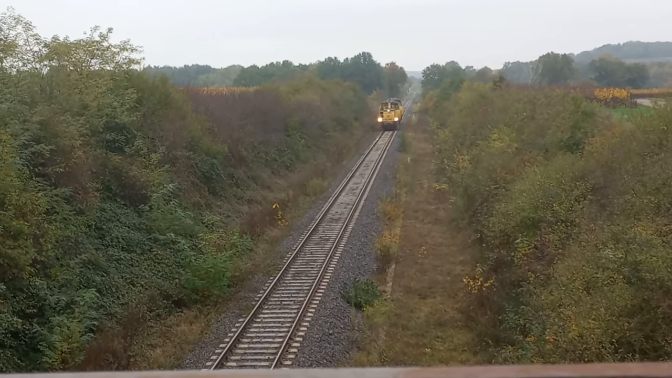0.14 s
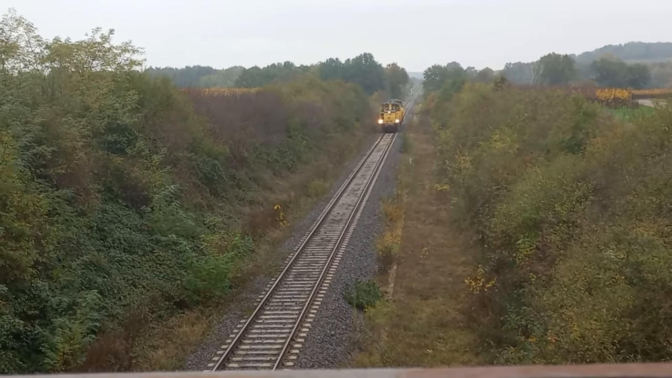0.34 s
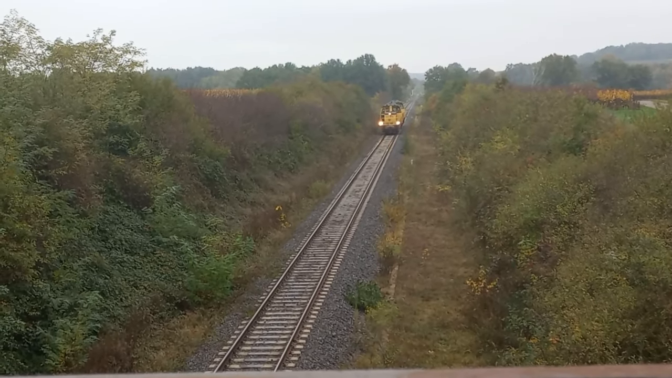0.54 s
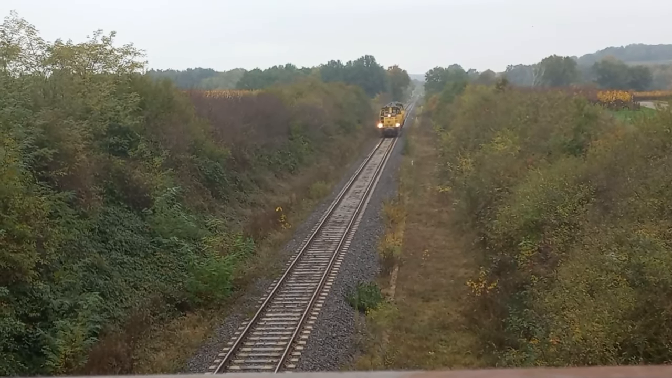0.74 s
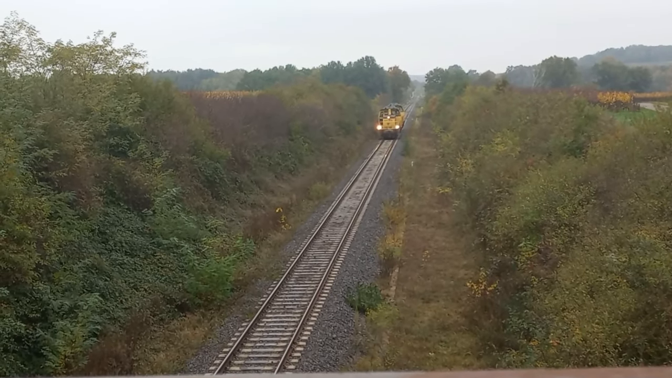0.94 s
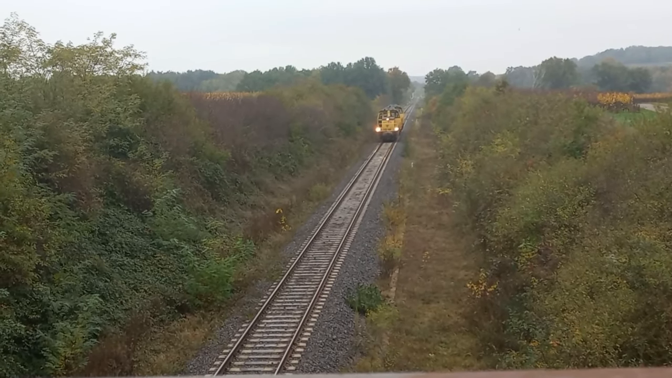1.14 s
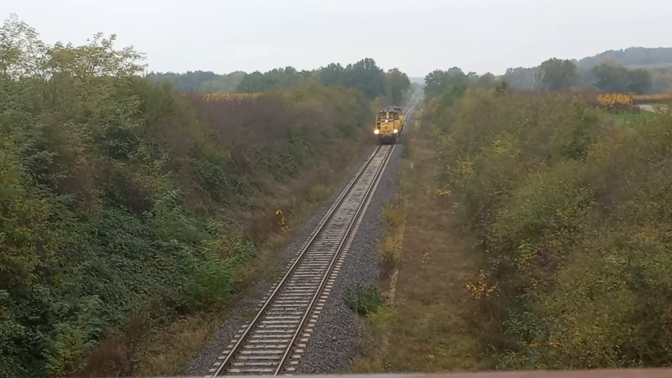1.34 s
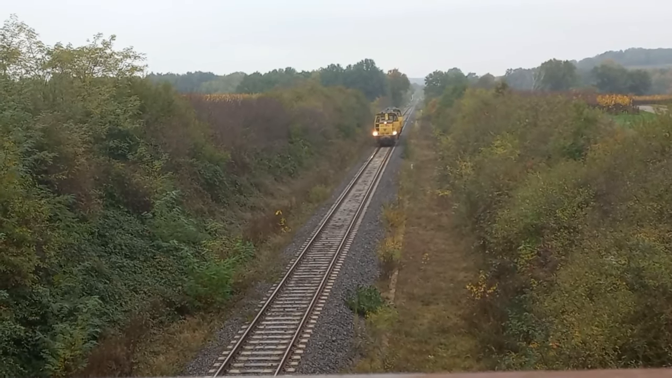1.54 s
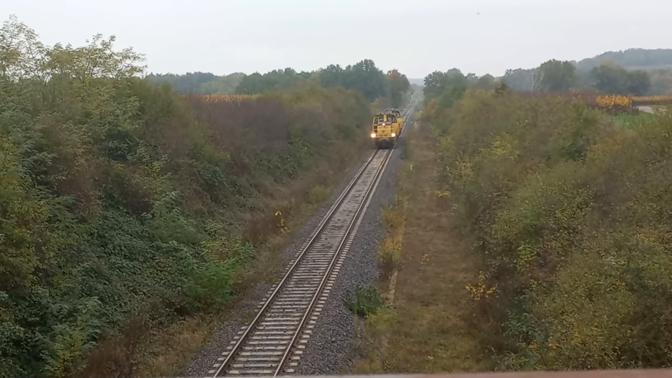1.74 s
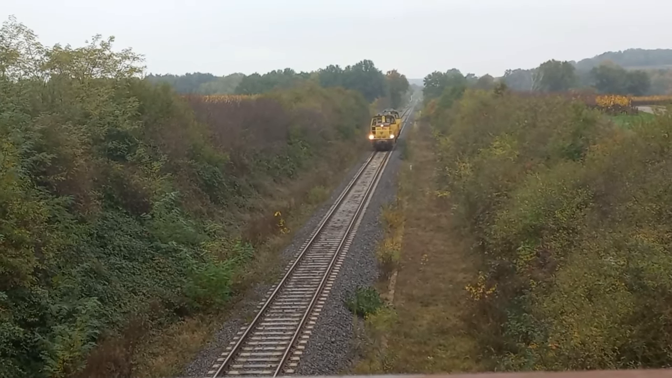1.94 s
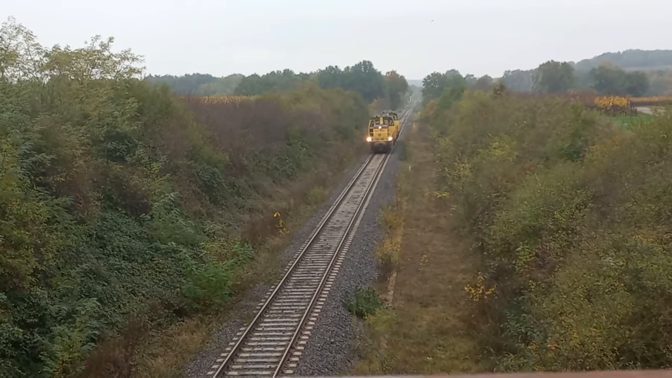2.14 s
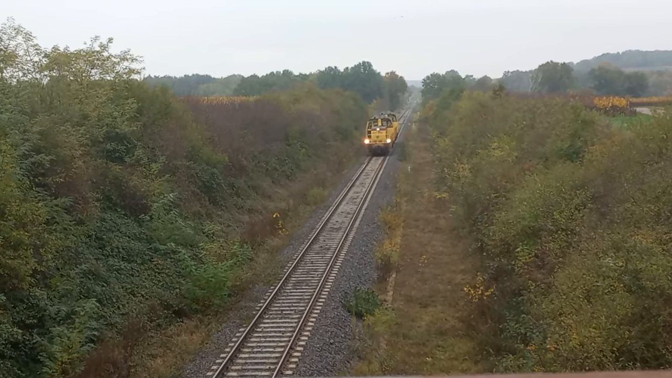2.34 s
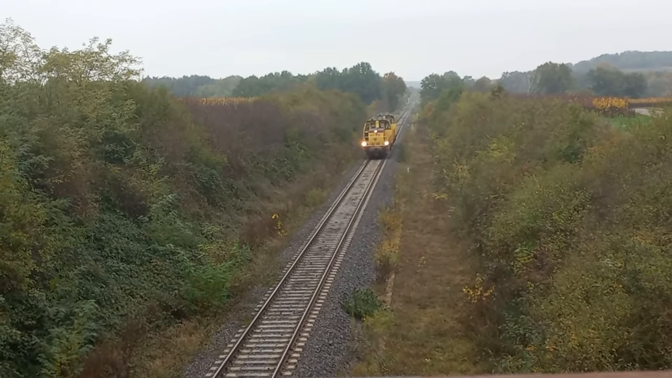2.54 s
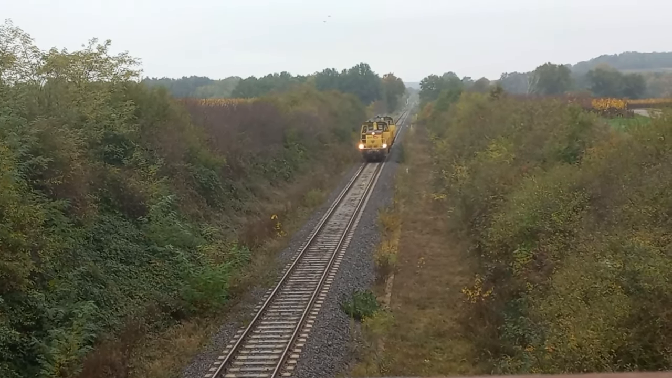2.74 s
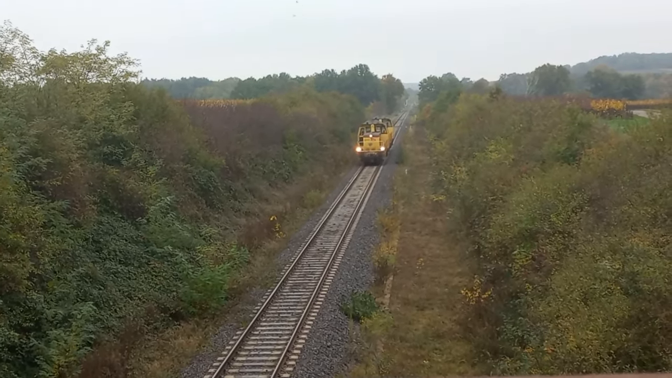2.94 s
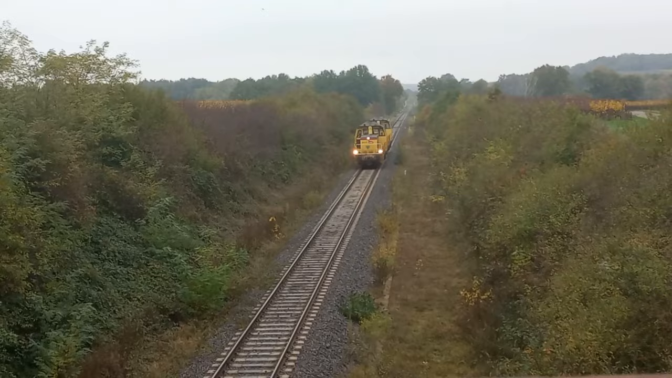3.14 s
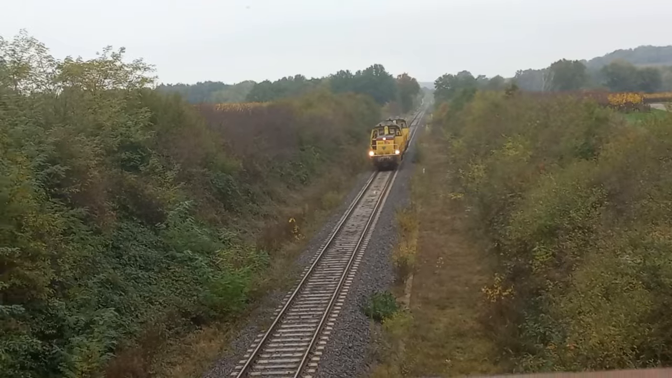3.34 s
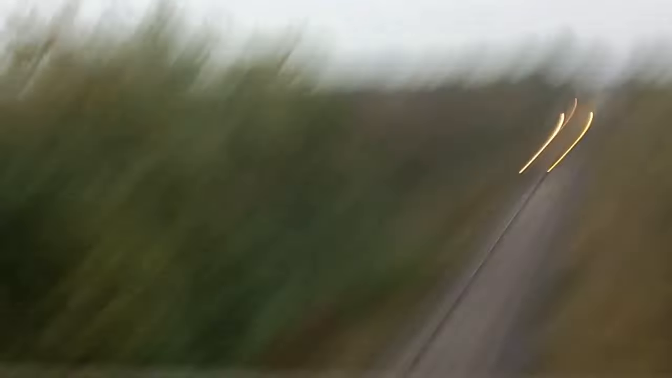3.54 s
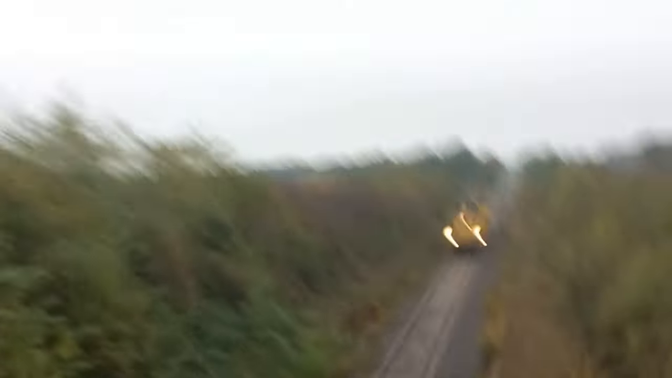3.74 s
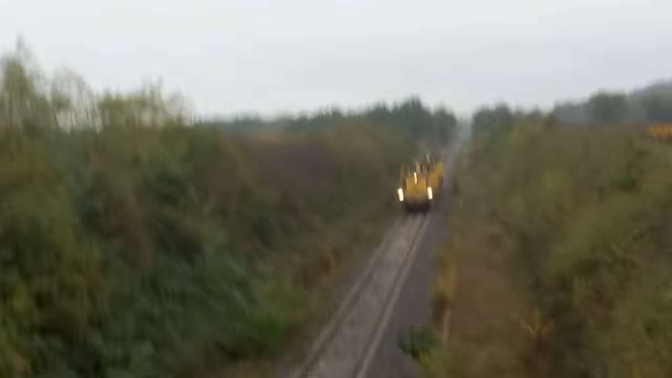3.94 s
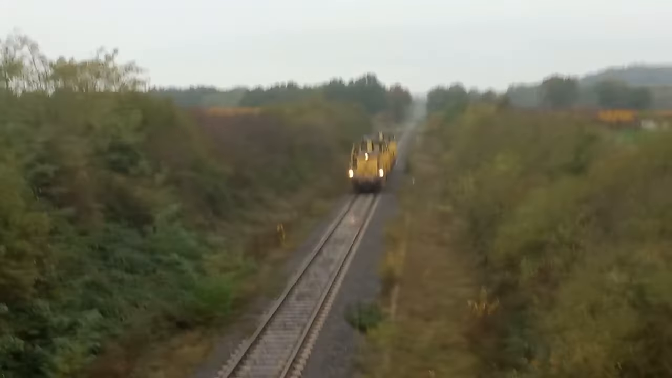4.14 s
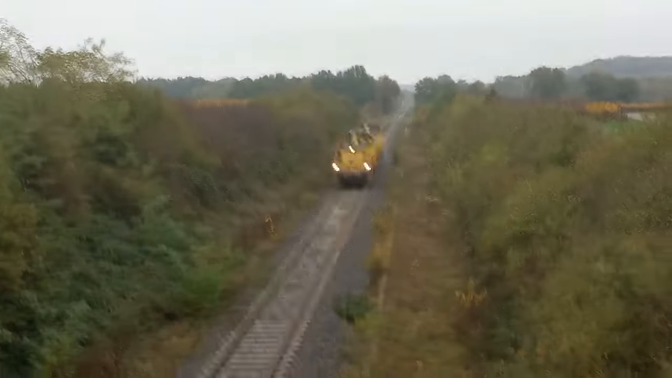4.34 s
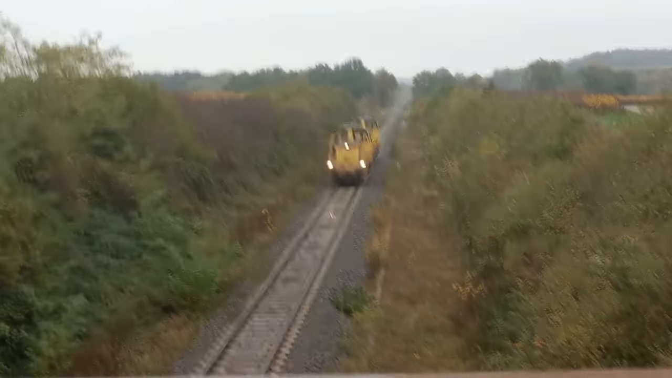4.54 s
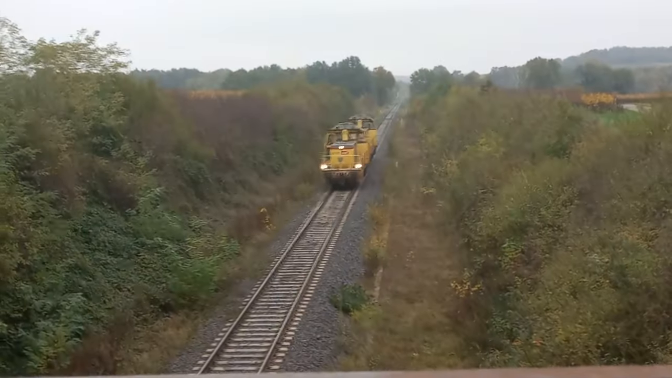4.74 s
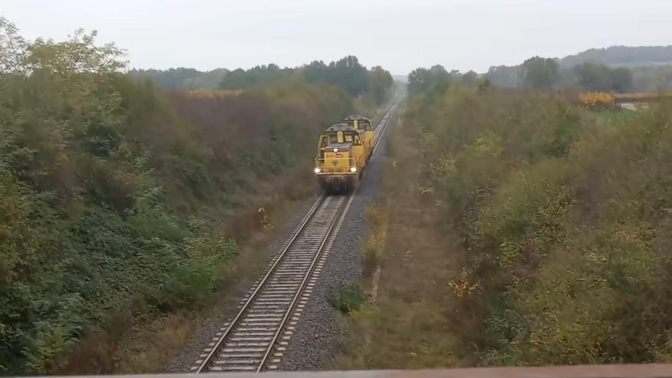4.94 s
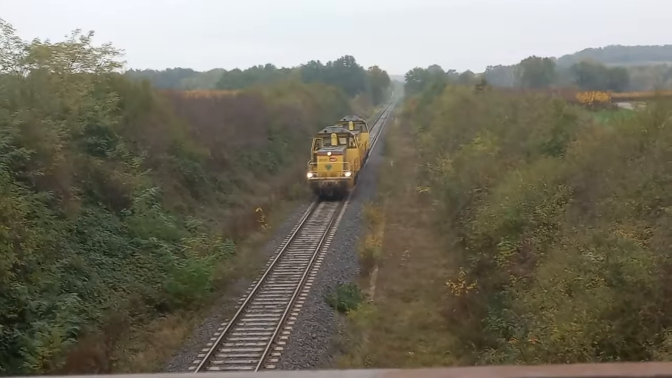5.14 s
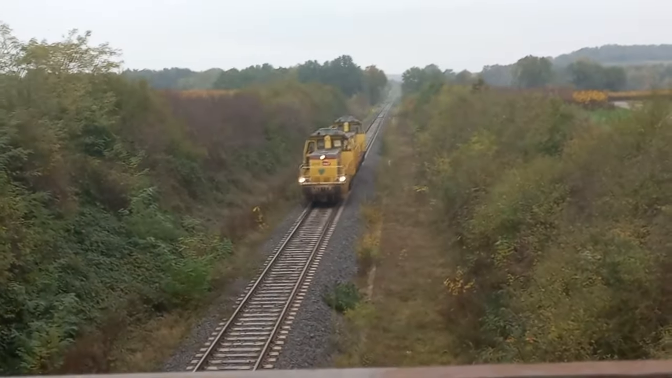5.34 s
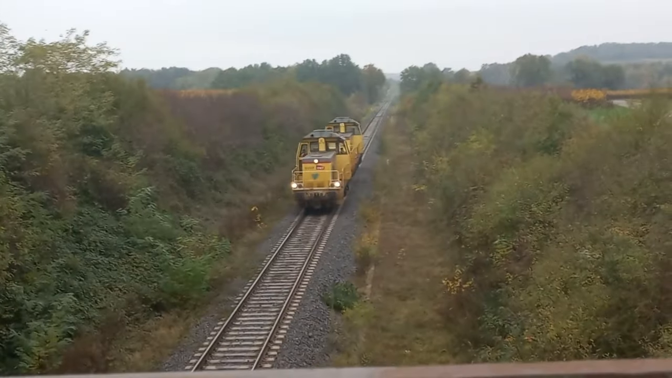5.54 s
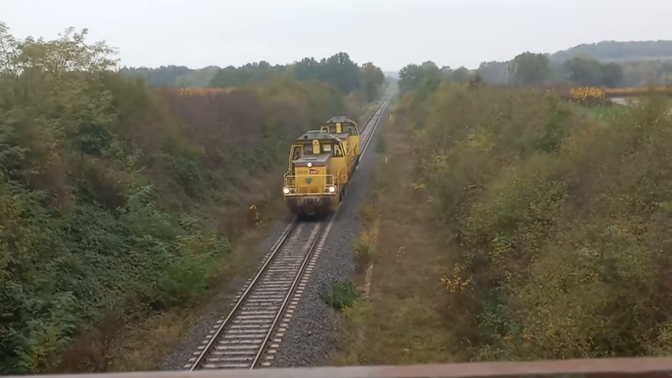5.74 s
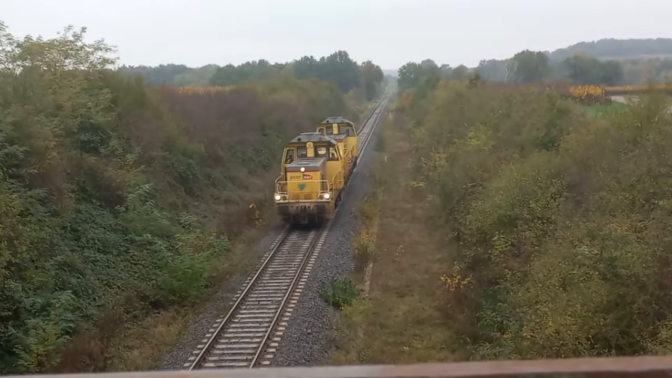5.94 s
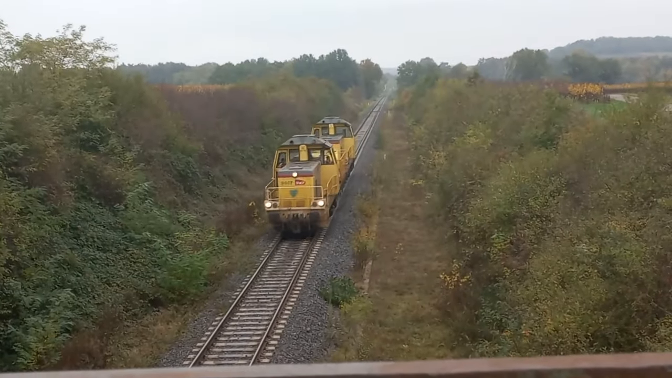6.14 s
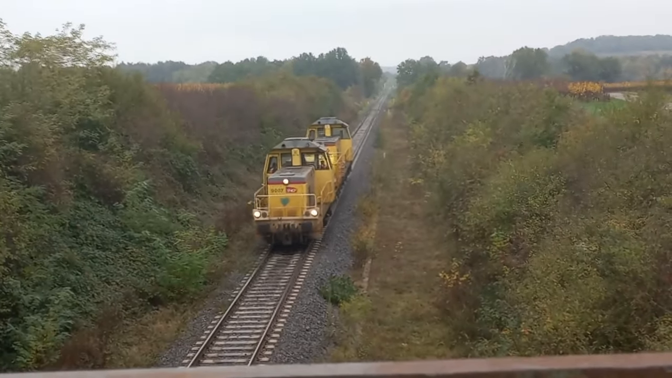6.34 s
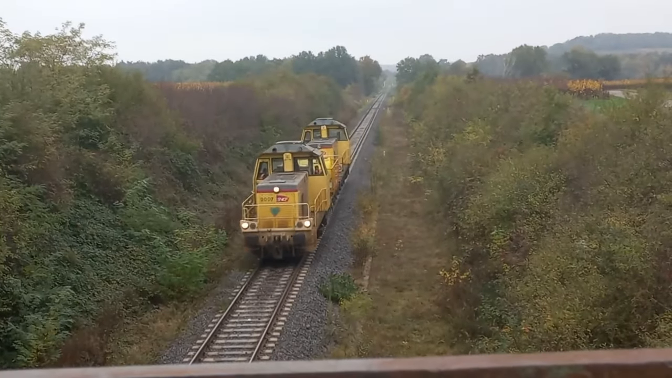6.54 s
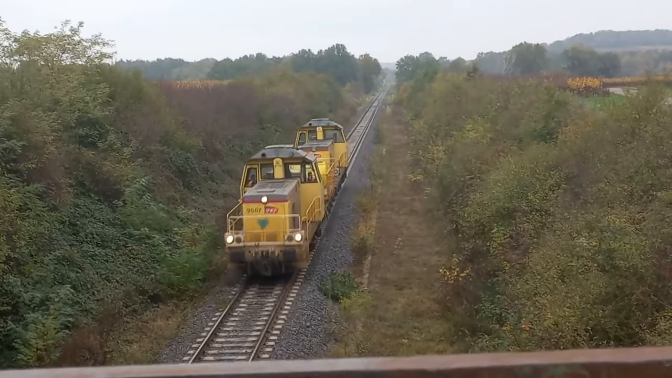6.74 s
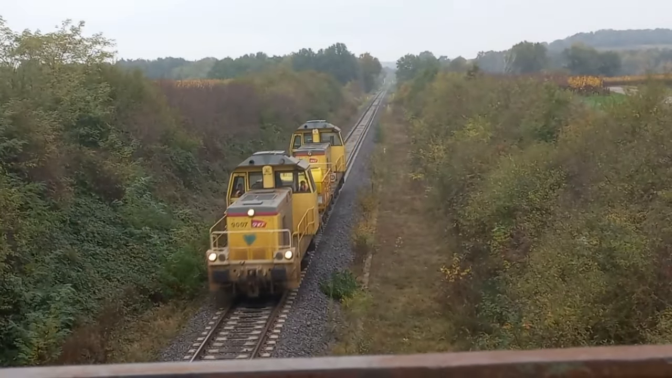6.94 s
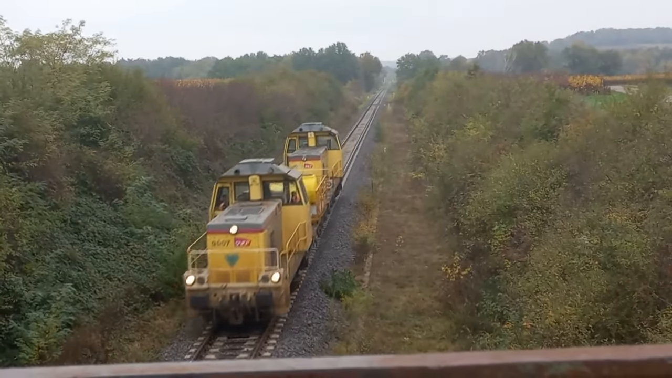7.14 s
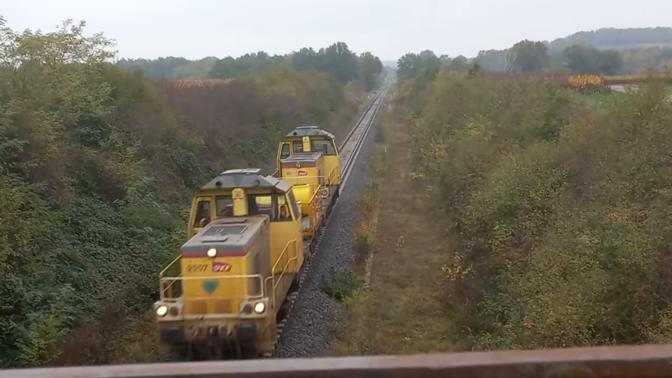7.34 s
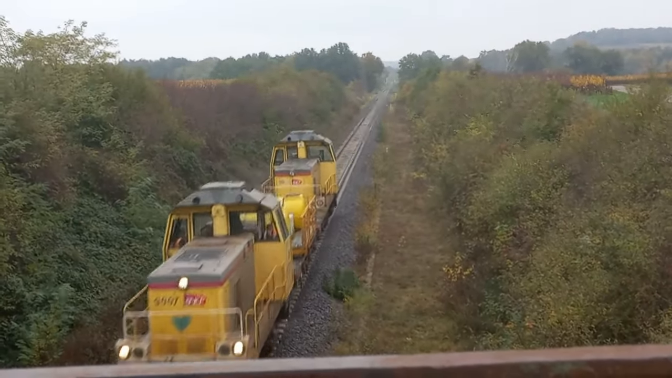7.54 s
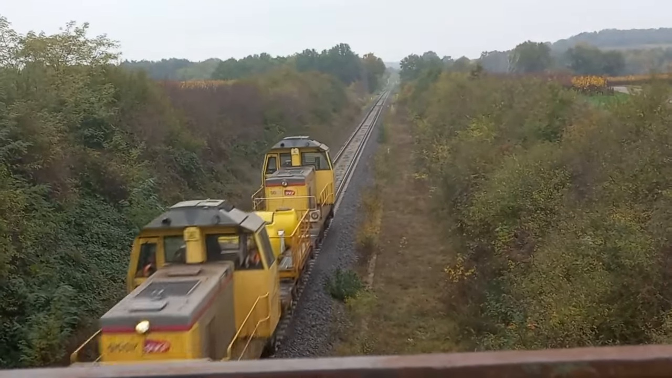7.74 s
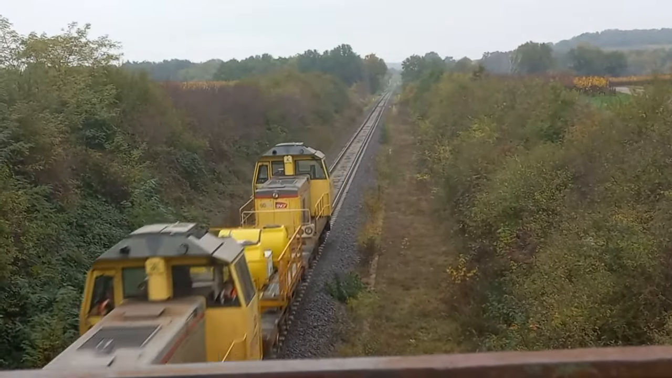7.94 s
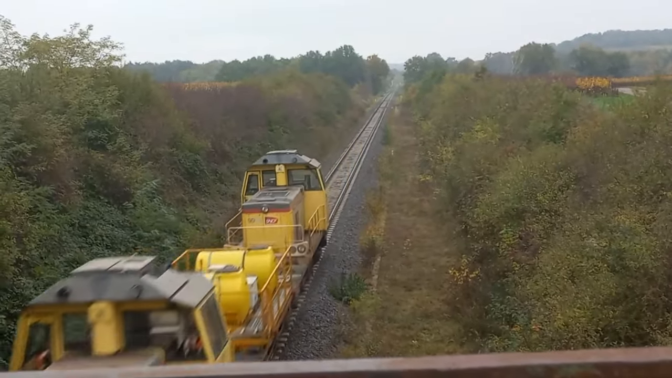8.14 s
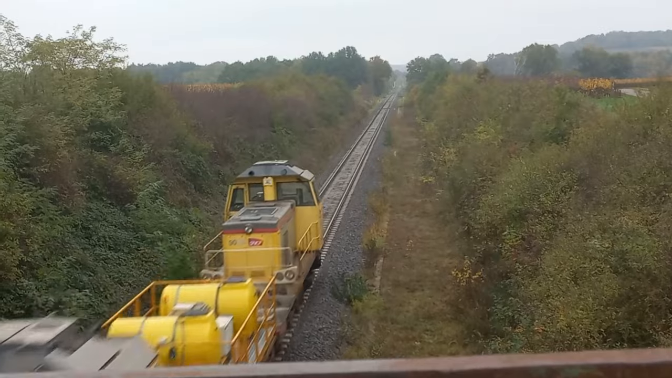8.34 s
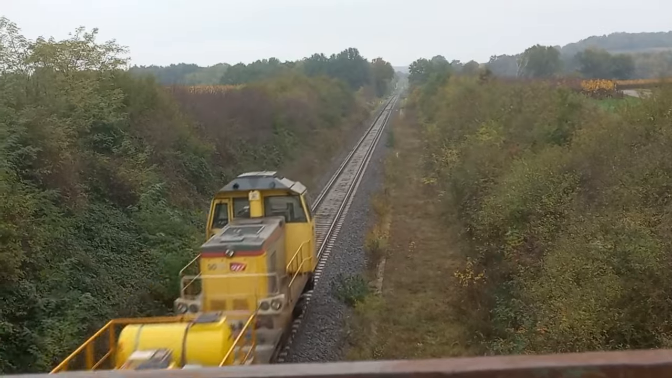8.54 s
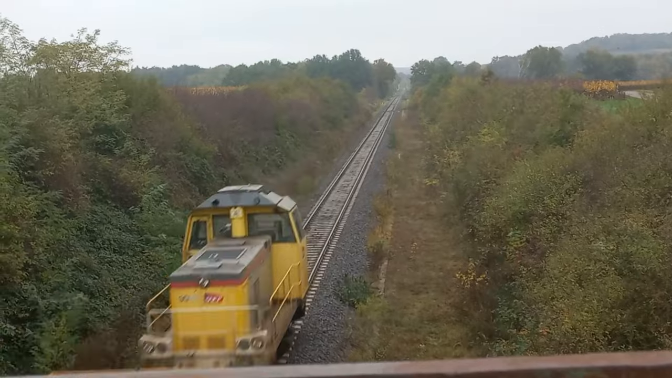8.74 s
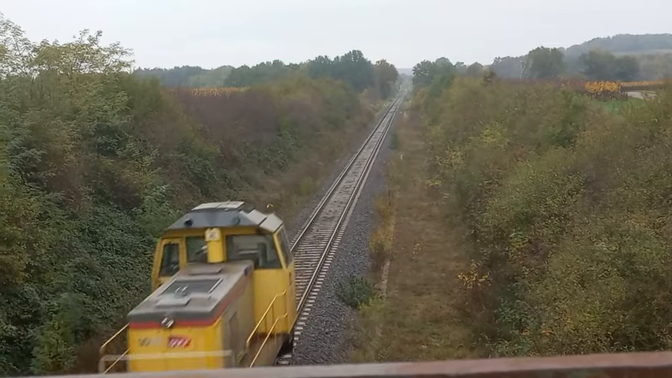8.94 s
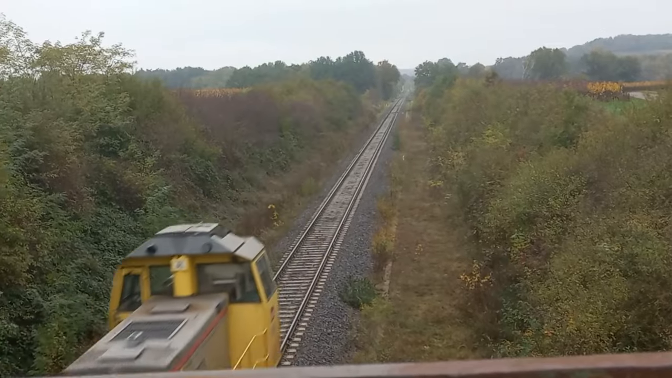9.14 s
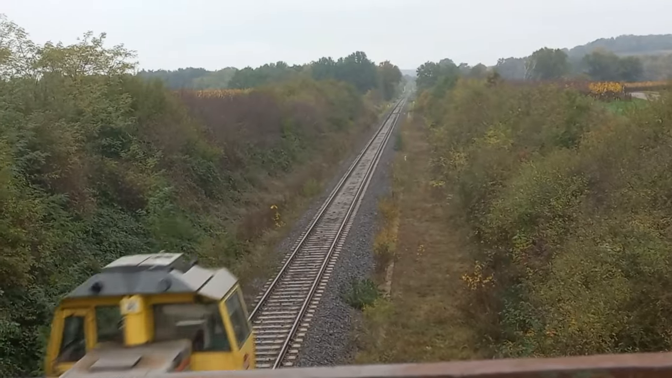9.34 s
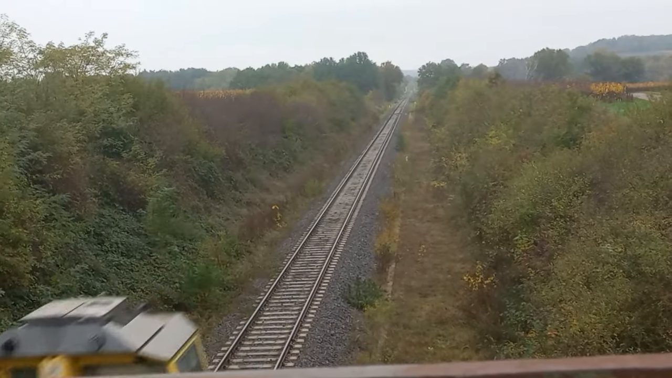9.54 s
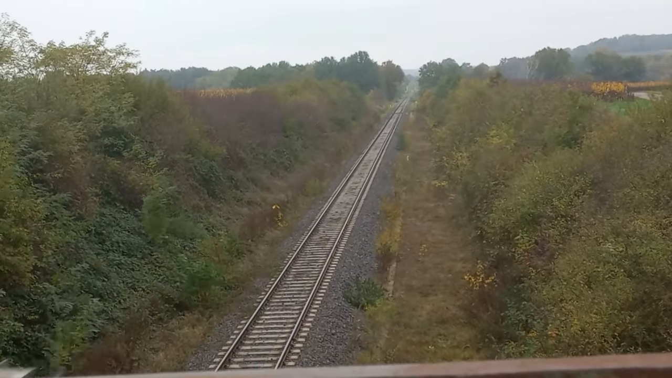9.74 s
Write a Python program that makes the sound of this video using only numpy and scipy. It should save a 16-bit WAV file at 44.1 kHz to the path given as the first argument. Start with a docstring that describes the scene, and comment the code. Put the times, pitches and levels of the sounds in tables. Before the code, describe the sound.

Near quiet at first, with a distant engine drone approaching through an open cutting. A brief reedy horn blast bursts out and its echo trails away; the camera casing clicks and rustles close by. The train builds steadily, wheels thumping over joints, and two diesel locomotives pass directly below the bridge with broad low roar, metallic clatter and airy hiss, becoming wider in stereo before the treble eases off.

```python
"""A railway cutting under a bridge, where a hand-held camera stands: two coupled diesel locomotives roll up and
pass below. Rumble, drone, roar, clatter and hiss are shaped noise that swells, combed by the ground echo;
an engine hum and a brief thin tone are sines, rail joints ringing thumps. One short horn blast, a train of
reed pulses, rings off the banks; two faint higher toots sound far off. The casing ticks and rustles: bursts
through plastic modes."""
import sys
import numpy as np
from scipy import signal
from scipy.io import wavfile
from scipy.ndimage import uniform_filter1d

SR = 44100
rng = np.random.default_rng(int(sys.argv[2]) if len(sys.argv) > 2 else 0)


def generate_wav(signal):
    """Clip the signal to [-1, 1] and save it as 16-bit WAV at the path in sys.argv[1]."""
    frames = np.transpose(np.atleast_2d(signal))
    scaled = np.clip(frames, -1, 1) * 32767
    pcm = np.round(scaled).astype(np.int16)
    wavfile.write(sys.argv[1], SR, pcm)


N = 436590

# Loudness of the nearing train. Each row: time in seconds, drone and roar relative level in dB.
ENGINE_LEVELS = [(0, -53, -53), (.55, -48, -50), (1.3, -46.5, -47.5), (2.9, -43, -43.5),
                 (3.6, -43.5, -44.5), (4.55, -39.5, -40.5), (4.85, -36, -36.5), (5.4, -32.5, -34.5),
                 (6.1, -31, -32.5), (6.8, -26, -28.5), (7.3, -24, -29), (7.7, -20.5, -28.5),
                 (8.1, -20.5, -26), (8.6, -20.5, -24.5), (8.95, -23, -27), (9.3, -20, -25.5),
                 (9.6, -19, -29.5), (9.9, -21.5, -27.5)]
# Clatter loudness, peaking as the second locomotive passes below. Each row: time in seconds, relative level in dB.
CLATTER_LEVELS = [(0, -60), (2, -55), (4.4, -49.5), (4.7, -46), (6, -42.5), (6.8, -38.5), (7.9, -36.5),
                  (8.15, -33), (8.3, -33.5), (8.7, -27.5), (8.87, -27.5), (9.03, -27), (9.14, -30.5),
                  (9.4, -32), (9.52, -36), (9.9, -36.5)]
# Spectra of the five train layers. Each row: frequency in Hz, relative level in dB.
RUMBLE_COLOUR = [(30, -24), (48, -29), (62, 7.5), (75, 8.5), (105, 10), (140, 0), (175, -18), (260, -58)]
DRONE_COLOUR = [(90, -27), (145, -6.5), (200, 0), (225, -2.5), (255, 1), (290, -9), (337, -12),
                (480, -54.5)]
ROAR_COLOUR = [(260, -46), (337, -9), (400, -5.5), (460, -1), (515, 0.5), (580, -5.5), (655, -12),
               (800, -9), (890, -11.5), (980, -22.5), (1300, -86)]
CLATTER_COLOUR = [(600, -53), (1000, -10), (1500, -2), (2500, -3), (5000, -7.5), (7000, -7.5), (7900, -18),
                  (9500, -29), (12000, -90)]
HISS_COLOUR = [(6000, -30), (8300, -10), (10000, -4), (12100, 0), (14800, -2), (16000, -5)]  # as heard close by
# Dips and humps, mostly from ground and parapet echoes; the narrow hump near 1.65 kHz is a faint whine. Each
# row: frequency in Hz, width in Hz, gain in dB.
ECHO_COMB = [(924, 75, -10), (1200, 470, 7), (1480, 120, -12), (1650, 23, 3), (1720, 76, -1),
             (1923, 102, -6), (2100, 150, 0), (2415, 78, -6.5), (2750, 150, -5.5), (3300, 140, -5.5),
             (3400, 78, 4), (3830, 110, -2), (4030, 64, 2.5), (4260, 89, -3)]
# Likeness of the two ports at spread 1. Each row: frequency in Hz, correlation from 0 to 1.
PORT_LIKENESS = [(30, 0.76), (60, 0.99), (150, 1), (250, 0.99), (400, 0.97), (640, 0.99), (1000, 0.8),
                 (1600, 0.75), (2600, 0.74), (4100, 0.72), (6500, 0.095), (9000, 0.055)]
# Port balance of the train. Each row: frequency in Hz, left minus right in dB.
PORT_BALANCE = [(60, 3), (150, 0), (380, 0.5), (950, -1), (2380, 1.5), (5980, 2), (15000, 0.5)]
# Engine order heard as a hum. Each row: time in seconds, rms level in dB.
HUM_LEVELS = [(8.7, -56), (8.88, -29), (9.2, -25.5), (9.5, -23), (9.64, -45), (9.76, -44), (9.9, -23)]
# Brief thin tone near 270 Hz within the drone. Each row: time in seconds, frequency in Hz, rms level in dB.
DRONE_TONE = [(7.33, 249.3, -36), (7.42, 261.5, -26), (7.54, 275.3, -25.5), (7.72, 274.8, -25),
              (7.8, 255.2, -28)]
# Wheels over rail joints. Each row: start in seconds, ring level in dB, pitch in Hz, glide in Hz per second,
# ring t60 in seconds, knock level in dB.
JOINT_THUMPS = [(6.906, -4, 226, 5, 0.077, -8), (7.073, -7, 213, 0, 0.092, -20),
                (7.201, -13.5, 251, 0, 0.21, -28), (7.258, -1, 192, 2000, 0.13, 4),
                (7.374, -9, 231, 0, 0.23, -29), (7.443, -12, 243, 0, 0.12, -27),
                (7.589, -10, 235.4, -5, 0.27, -16), (7.674, 0, 236, -2, 0.092, -28),
                (7.755, -3.5, 264, -900, 0.15, -27), (7.789, 0.5, 203, 0, 0.091, -26),
                (7.857, -6, 208, 0, .14, -23), (7.878, -24, 230, 0, .1, -0.5),
                (8.03, -10.5, 270, 0, 0.15, -22), (8.165, -4, 263, 0, 0.1, -22),
                (8.324, -5, 270, 0, 0.087, -18), (9.033, -10.5, 224, 0, 0.17, -29),
                (9.132, -6, 248, 0, .11, -22), (9.503, -5, 248, 0, 0.094, -12),
                (9.743, -3, 241, 0, 0.078, -11)]
# Near blast: full blowing from in seconds, hold in seconds, pitch in Hz, relative level in dB.
NEAR_BLAST = (3.3035, .042, 393.5, -11.5)
# Faint far toots. Each row: columns as for the near blast.
FAR_TOOTS = [(3.106, .022, 436, -49.5), (3.838, .03, 435, -43)]
# Colour of the horn flare, near and far. Each row: frequency in Hz, gain in dB.
NEAR_BELL = [(200, -30), (388, -7.5), (776, -1), (1164, 0), (1550, -10.5), (1940, -11), (2330, -10),
             (2720, -15), (3490, -14.5), (4270, -20), (5000, -20), (7400, -24), (7800, -33), (11600, -33),
             (15500, -42)]
FAR_BELL_COLOUR = [(400, -22), (860, -5), (1300, 2.5), (1730, 1.5), (2200, -22), (3500, -26), (6000, -45)]
# Left port faces the horn. Each row: frequency in Hz, gain in dB.
LEFT_FACING = [(300, -.5), (1500, -.5), (3000, 1), (15000, 3)]
# Camera body shades the right port. Each row: frequency in Hz, gain in dB.
RIGHT_SHADE = [(300, -1), (1500, 0), (4000, -1), (15000, -2)]
# Clear echoes of the cutting. Each row: delay in seconds, left and right level in dB.
CLEAR_ECHOES = [(.157, -19, -19), (.24, -31, -31)]
# Colour of all horn echoes. Each row: frequency in Hz, gain in dB.
BANK_COLOUR = [(300, 0), (400, 0), (600, -4), (800, -6), (1200, -5), (1900, 4), (2400, 1), (3100, 1),
               (4000, 3), (5000, 0), (6000, 2), (9000, 1)]
# Decay of the banks' diffuse tail. Each row: frequency in Hz, t60 in seconds.
BANK_T60 = [(400, 1.0), (800, .7), (1200, 2.0), (1600, 1.5), (2300, 1.7), (3200, 2.8), (4200, 2.2),
            (6000, 1.0), (15000, .4)]
# Casing ticks. Each row: start in seconds, base level in dB, rise in seconds, t60 in seconds, snap level in dB.
CASING_TICKS = [(3.3975, -48, .0002, .006, -42), (3.402, -45, .001, .012, -50),
                (3.4693, -43, .0002, .012, -44), (3.5186, -43, .001, .03, -55),
                (3.5352, -28, .0006, .04, -40), (3.5935, -46, .0002, .004, -35),
                (3.6767, -49, .002, .05, -60), (3.7056, -50, .0002, .015, -54),
                (4.4504, -21, .0001, .014, -28), (4.486, -22, .0002, .018, -31),
                (4.4918, -23, .0003, .02, -36), (4.4955, -29, .0003, .012, -40),
                (4.5025, -14.5, .002, .018, -45), (4.5405, -21, .001, .028, -36),
                (4.546, -33, .0005, .02, -45), (4.5632, -35, .001, .04, -50), (4.569, -37, .001, .03, -55),
                (4.6141, -35, .001, .035, -50), (4.6275, -32, .001, .025, -44)]
# Single tones among the ticks. Each row: start in seconds, frequency in Hz, relative level in dB, t60 in seconds.
TICK_TONES = [(4.4865, 4000, -21, .011), (4.492, 4000, -23, .011), (4.5022, 4000, -14, .01),
              (4.5025, 6800, -26, .014), (4.5025, 13600, -31, .05)]
# Finger rustle. Each row: start in seconds, hold in seconds, relative level in dB.
FINGER_GRIPS = [(3.35, .035, -46), (3.475, 0.065, -50), (4.46, 0.047, -51)]
# Resonances of the plastic casing, then of the rustle. Each row: frequency in Hz, width in Hz, gain in dB.
CASING_MODES = [(13700, 350, 2), (12300, 700, -4), (10500, 2000, -21), (6800, 1500, -15), (4600, 2500, -18),
                (2400, 1800, -13)]
RUSTLE_MODES = [(14200, 3500, -5), (11000, 3000, 0.5)]

# Train: rumble equals roar at the pivot; hiss falls faster than the clatter, and more steeply below the knee.
RUMBLE_PIVOT_DB, RUMBLE_DB_PER_ROAR_DB = -29.5, 0.99
HISS_TOP_DB, HISS_DB_PER_CLATTER_DB = -30, 1.677
HISS_KNEE_DB, HISS_EXTRA_DB_PER_CLATTER_DB = -52.5, 4.3
# Coming under the bridge: spectra slide up, the comb fades, the sound spreads.
UNDER_FROM_S, UNDER_S = 6.74, 2.66
SLIDE_UP, COMB_LEFT, SPREAD_FAR, SPREAD_UNDER = 0.19, 0.34, 0.92, 5.5
ROAR_EDGE_SLIDE, COMB_SLIDE = 0.98, 0.79  # exponents; the roar's upper edge gets this on top of its core's
CENTRE_S, LAG_MS_PER_S = 3.5, -.021  # drifts leftward: the left port hears it sooner
HUM_HZ, HUM_SAG_HZ_PER_S = 94.3, 3.3
THUMP_RISE_S, KNOCK_T60_S = 0.0057, .06
FRAME_RATIO, FRAME_DB = 0.603, -13  # frame tone against rail tone

# Horn: low harmonics (body) speak first; high ones (edge) drop quickly at the release.
BODY_RISE_DB_PER_S, BODY_DROOP_DB_PER_S, BODY_FALL_DB_PER_S = 1700, 200, 340
EDGE_RISE_DB_PER_S, EDGE_DROOP_DB_PER_S, EDGE_FALL_DB_PER_S = 5000, 40, 450
EDGE_DB, EDGE_DROP_DB, EDGE_DROP_S = -1, -12, .008
BODY_EARLY_S, FULL_S = .003, .013  # all hold full strength for FULL_S before the droop
TOP_DROOP_DB_PER_S = 800  # times (k - 9) / count for harmonic k above 9
BEND_UP_S, START_FLAT_HZ, SAG_HZ, SAG_S = .009, 9, 11, .014  # pitch climbs, then sags and settles
HARMONIC_WAVER_DB, HARMONIC_WAVER_HZ = 1.1, 26  # at full share, before it deepens with the hold

# Banks: the nearest slopes scatter more and die sooner; leaves blur the clear echoes.
BANKS_DB, FAR_BANK_PAN_DB = -21.5, 4  # diffuse tail before the near scatter; left minus right
NEAR_BANKS_DB, NEAR_BANKS_T60_S, ECHO_BLUR_S = 19, .15, .00016

# Handling: scratch and ping are relative to a tick's base level.
TICK_PAN_DB, SCRATCH_DB, SNAP_HZ = -8.5, 4.5, 7000
PING_HZ, PING_DB, PING_T60_S, TONE_RISE_S = 8150, -17, .011, .0025
GRIP_RISE_DB_PER_S, GRIP_FALL_DB_PER_S = 300, 250

LOW_CUT_HZ, EDGE_HZ = 82, 15800


def gain_of(db):
    """Decibels to a factor."""
    return 10 ** (np.asarray(db) / 20)


def evened(x):
    """Scales to rms 1."""
    return x / np.sqrt(np.mean(x ** 2) + 1e-20)


def read(points, hz):
    """Reads a spectrum on a log-frequency axis."""
    f, value = np.transpose(points)
    return np.interp(np.log(hz + 1), np.log(f + 1), value)


def curve(rows, t):
    """Columns of a table at the times t."""
    s, *columns = np.transpose(rows)
    return [np.interp(t, s, c) for c in columns]


def add(mix, s, sound):
    """Mixes a sound in at s seconds."""
    part = mix[..., round(s * SR):][..., :sound.shape[-1]]
    part += sound[..., :part.shape[-1]]


def resonate(x, hz, width):
    """Two-pole resonance of gain 1."""
    return signal.lfilter(*signal.iirpeak(min(hz, .45 * SR), hz / width, SR), x)


def causal(points):
    """Minimum-phase impulse response: rings after, not before."""
    log_gain = np.log(gain_of(read(points, abs(np.fft.fftfreq(4096, 1 / SR)))))
    return np.fft.ifft(np.exp(np.conj(signal.hilbert(log_gain)))).real[:2048]


def train(patchy_db=1.5, flicker_db=0.72, dulling=0.54, surge_db=0.6):
    """Five noise layers in short-time spectra, combed by the echoes, heard at two microphone ports."""
    frames, hz = N // 512 + 5, np.fft.rfftfreq(2048, 1 / SR)
    t = np.arange(frames) * 512 / SR
    a, b, c, d, patches = rng.standard_normal((frames, 1025, 5)).T
    patches = evened(uniform_filter1d(uniform_filter1d(patches, 8, 0), 6, 1))
    # quick random flicker: treble and roar rise while rumble and drone sink
    flicker = evened(uniform_filter1d(rng.standard_normal(frames), 2))
    surges_db = surge_db * evened(uniform_filter1d(rng.standard_normal((2, frames)), size=6))

    under = np.clip((t - UNDER_FROM_S) / UNDER_S, 0, 1)
    stretch = 1 + SLIDE_UP * under
    comb_depth = 1 - (1 - COMB_LEFT) * np.sqrt(under)
    spread = SPREAD_FAR + (SPREAD_UNDER - SPREAD_FAR) * under

    drone_db, roar_db = curve(ENGINE_LEVELS, t)
    clatter_db, = curve(CLATTER_LEVELS, t)
    rumble_db = RUMBLE_PIVOT_DB + RUMBLE_DB_PER_ROAR_DB * (roar_db - RUMBLE_PIVOT_DB) + surges_db[0]
    far_db = HISS_DB_PER_CLATTER_DB * (clatter_db - clatter_db.max())
    far_db += HISS_EXTRA_DB_PER_CLATTER_DB * np.minimum(clatter_db - HISS_KNEE_DB, 0)
    dulling_db = np.maximum(far_db, -35)  # distance dulls the treble

    # each row: colour, level in dB, flicker factor, slide exponent
    layers = [(RUMBLE_COLOUR, rumble_db, -1.4, 0.67),
              (DRONE_COLOUR, drone_db + surges_db[1], -1.07, 1.0),
              (ROAR_COLOUR, roar_db, 1.07, 0.52),
              (CLATTER_COLOUR, clatter_db, 0.86, 0.12),
              (HISS_COLOUR, HISS_TOP_DB + far_db, 2.6, 0.072)]
    power = 0
    for shape, level_db, shake, slide in layers:
        if shape is ROAR_COLOUR:
            edge = np.clip(np.log2(hz / 600 + 1e-9), 0, 1)
            slide = (slide + ROAR_EDGE_SLIDE * edge)[:, None]
        colour_db = read(shape, hz[:, None] / stretch ** slide)
        if shape is HISS_COLOUR:
            colour_db += dulling * np.outer(np.log2(np.maximum(hz, 8000) / 8000), dulling_db)
        if shape is CLATTER_COLOUR:
            colour_db += 0.16 * dulling * np.outer(np.log2(np.maximum(hz, 2000) / 2000), dulling_db)
        colour = gain_of(colour_db) ** 2
        power = power + colour / colour.sum(0) * gain_of(level_db + shake * flicker_db * flicker) ** 2

    comb_db = 0
    for f, width, db in ECHO_COMB:
        slid_hz = hz[:, None] / stretch ** (COMB_SLIDE * (f < 1300))  # only the low end slides
        comb_db = comb_db + db * np.exp(-((slid_hz - f) / width) ** 2)
    size = np.sqrt(power) * gain_of(comb_db * comb_depth + patchy_db * patches)

    same = np.clip(read(PORT_LIKENESS, hz), 0, 1)[:, None] ** spread
    left = a + 1j * b
    right = same * left + np.sqrt(1 - same ** 2) * (c + 1j * d)
    lag_s = LAG_MS_PER_S * np.maximum(t - CENTRE_S, 0) / 1000
    late = np.exp(-2j * np.pi * np.outer(hz, lag_s))
    tilt = gain_of(read(PORT_BALANCE, hz) / 2)[:, None]
    z = np.array([left * late * tilt, right / tilt]) * size
    return gain_of(1.5) * signal.istft(z, nperseg=2048, noverlap=1536)[1][:, :N]


def hums(waver_db=1.0):
    """An engine order: a sine that sinks in pitch and wavers in strength."""
    t = np.arange(HUM_LEVELS[0][0], N / SR, 1 / SR)
    hz = HUM_HZ - HUM_SAG_HZ_PER_S * (t - t[0])
    waver = evened(uniform_filter1d(uniform_filter1d(rng.standard_normal(len(t)), 2000), 2000))
    level = np.sqrt(2) * gain_of(curve(HUM_LEVELS, t)[0] + waver_db * waver)
    out = np.zeros(N)
    add(out, t[0], level * np.sin(2 * np.pi * np.cumsum(hz) / SR))
    return out


def drone_tone():
    """A brief thin tone near 270 Hz: a sine gliding within the drone, faded in and out."""
    t = np.arange(DRONE_TONE[0][0], DRONE_TONE[-1][0], 1 / SR)
    hz, db = curve(DRONE_TONE, t)
    level = np.sqrt(2) * signal.windows.tukey(len(t), .3) * gain_of(db)
    out = np.zeros(N)
    add(out, t[0], level * np.sin(2 * np.pi * np.cumsum(hz) / SR))
    return out


def thumps():
    """Each joint rings the rail and frame briefly, with a short noise knock on top."""
    out, t = np.zeros(N), np.arange(12000) / SR
    noise = rng.standard_normal((len(JOINT_THUMPS), 12000))
    knocks = resonate(resonate(noise, 860, 360), 860, 360) * gain_of(-60 * t / KNOCK_T60_S)
    for (s, db, hz, glide, t60, knock_db), knock in zip(JOINT_THUMPS, knocks):
        pitch = hz + glide * np.minimum(t, t60 / 3)
        phase = 2 * np.pi * np.cumsum(pitch) / SR
        tones = np.sin(phase) + gain_of(FRAME_DB) * np.sin(FRAME_RATIO * phase)
        ring = gain_of(db - 60 * t / t60) * tones
        add(out, s, (1 - np.exp(-t / THUMP_RISE_S)) * (ring + gain_of(knock_db) * knock))
    return out


def horn(blast, bell, count):
    """A reed's regular pulses ring through the flare; the sharp edge comes only at full blowing."""
    start, hold, top_hz, level_db = blast
    t = np.arange(-.025, hold + .1, 1 / SR)
    before, after = np.maximum(-t, 0), np.maximum(t - hold, 0)
    held = np.clip(t - FULL_S, 0, hold - FULL_S)
    body_db = -BODY_RISE_DB_PER_S * np.maximum(before - BODY_EARLY_S, 0)
    body_db -= BODY_DROOP_DB_PER_S * held + BODY_FALL_DB_PER_S * after
    edge_db = EDGE_DB - EDGE_RISE_DB_PER_S * before - EDGE_DROOP_DB_PER_S * held
    edge_db += EDGE_DROP_DB * np.minimum(after / EDGE_DROP_S, 1) - EDGE_FALL_DB_PER_S * after
    top_db = -TOP_DROOP_DB_PER_S * held  # the highest harmonics droop most

    hz = top_hz - START_FLAT_HZ * np.clip(1 - t / BEND_UP_S, 0, 1)
    hz -= SAG_HZ * (1 - np.exp(-np.maximum(t - BEND_UP_S, 0) / SAG_S))
    turns = np.cumsum(hz) / SR
    turns -= np.interp(0, t, turns)  # a pulse falls on the start of full blowing

    # upper harmonics swell and sink at random, more so late in the blast
    waver = np.sin(2 * np.pi * (HARMONIC_WAVER_HZ * t + rng.random((count, 1))))
    waver_db = HARMONIC_WAVER_DB * (1 + held / FULL_S) * waver
    pulses = 0
    for k in range(1, count):
        edge_share = np.clip((k - 3) / 3.5, 0, 1)
        swing = 2.0 if k == 3 else 1  # the third harmonic follows the blowing most
        db = swing * body_db + edge_share * (edge_db - body_db + waver_db[k]) + max(k - 9, 0) / count * top_db
        pulses = pulses + gain_of(db) * np.cos(2 * np.pi * k * turns)
    rasp = rng.standard_normal(len(t)) * (.3 + np.exp(-(turns % 1) / .2))  # air, strongest at each pulse
    pulses += gain_of(edge_db - 3) * rasp
    out = np.zeros(N)
    add(out, start + t[0], gain_of(level_db) * signal.fftconvolve(pulses, causal(bell)))
    return out


def shaded(x):
    """The right port also hears a reflection off the camera a quarter millisecond later."""
    x = signal.fftconvolve(x, causal(RIGHT_SHADE))[:N]
    return (np.roll(x, -1) + .3 * np.roll(x, 10)) / 1.2


def banks(x):
    """A few clear echoes and a diffuse tail from the sides of the cutting."""
    taps = np.zeros((2, SR))
    at = np.arange(400, SR - 20, 20) + rng.integers(0, 20, (2, (SR - 401) // 20))
    np.put_along_axis(taps, at, rng.choice([-1., 1.], at.shape), 1)
    hz, t, z = signal.stft(taps, SR, nperseg=256)
    decay = gain_of(-60 * t / read(BANK_T60, hz)[:, None])
    tail = signal.istft(z * decay, SR, nperseg=256)[1]
    tail *= gain_of(BANKS_DB) / np.linalg.norm(tail[0])
    far = gain_of([[FAR_BANK_PAN_DB / 2], [-FAR_BANK_PAN_DB / 2]])  # the long tail leans left
    near = gain_of(NEAR_BANKS_DB - 60 * np.arange(tail.shape[1]) / SR / NEAR_BANKS_T60_S)
    tail *= far + near
    blur = np.exp(-np.arange(40) / SR / ECHO_BLUR_S)
    for delay, *sides_db in CLEAR_ECHOES:
        add(tail, delay, np.outer(gain_of(sides_db), blur / blur.sum()))
    coloured = signal.fftconvolve(x, causal(BANK_COLOUR))
    return signal.fftconvolve(coloured[None], tail, axes=1)[:, :N]


def casing(x, modes):
    """Thin plastic rings in a few broad modes."""
    return sum(gain_of(db) * resonate(x, hz, width) for hz, width, db in modes)


def handling():
    """A tick is a snap, a scratchy noise burst and a ping; a few tones and finger rustle join in."""
    t, now = np.arange(4000) / SR, np.arange(N) / SR
    rustle = 0
    for s, hold, db in FINGER_GRIPS:
        rise_db = GRIP_RISE_DB_PER_S * np.maximum(s - now, 0)
        fall_db = GRIP_FALL_DB_PER_S * np.maximum(now - s - hold, 0)
        rustle = rustle + gain_of(db - rise_db - fall_db)
    out = rustle * casing(rng.standard_normal((2, N)), RUSTLE_MODES)

    bursts = rng.standard_normal((len(CASING_TICKS), 2, 4000))
    sides = gain_of([[TICK_PAN_DB / 2], [-TICK_PAN_DB / 2]])
    ping = np.sin(2 * np.pi * PING_HZ * t) * gain_of(-60 * t / PING_T60_S) * sides
    snap = signal.lfilter(*signal.butter(2, SNAP_HZ, "high", fs=SR), 1. * (t == 0)) * sides
    for (s, db, rise, t60, snap_db), burst in zip(CASING_TICKS, bursts):
        onset = (1 - np.exp(-t / rise)) ** 2
        scratch = burst * onset * gain_of(db + SCRATCH_DB - 60 * t / t60) * sides
        add(out, s, casing(scratch, CASING_MODES))
        add(out, s, gain_of(db + PING_DB) * ping * onset + gain_of(snap_db) * snap)

    for (s, hz, db, t60), noise in zip(TICK_TONES, rng.standard_normal((len(TICK_TONES), 4000))):
        tone = np.sin(2 * np.pi * hz * t) + resonate(noise, hz, 700)
        onset = (1 - np.exp(-t / TONE_RISE_S)) ** 2
        add(out, s, gain_of(db - 60 * t / t60) * onset * tone * sides)
    return out


def scene():
    """Train, horns with their echoes, and the hands on the camera."""
    horns = horn(NEAR_BLAST, NEAR_BELL, count=41)
    horns = horns + sum(horn(toot, FAR_BELL_COLOUR, count=12) for toot in FAR_TOOTS)
    direct = np.array([signal.fftconvolve(horns, causal(LEFT_FACING))[:N], shaded(horns)])
    return train() + hums() + drone_tone() + thumps() + direct + banks(horns) + handling()


def record(dry):
    """The microphone's bass cut, then the band limit."""
    cut = signal.sosfilt(signal.butter(3, LOW_CUT_HZ, "high", fs=SR, output="sos"), dry)
    return signal.oaconvolve(cut, signal.firwin(511, EDGE_HZ, window=("kaiser", 9), fs=SR)[None], "same")


dry = scene()
out = record(dry)
generate_wav(out)
```